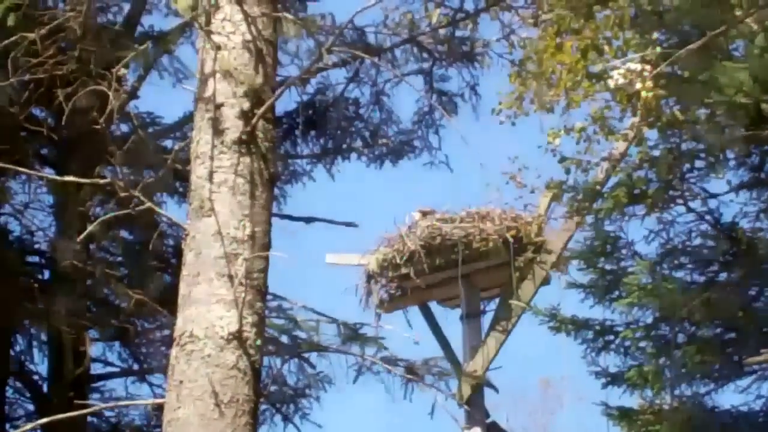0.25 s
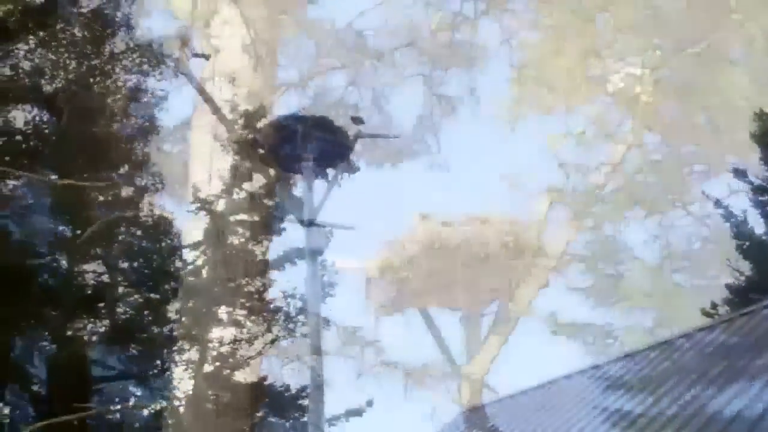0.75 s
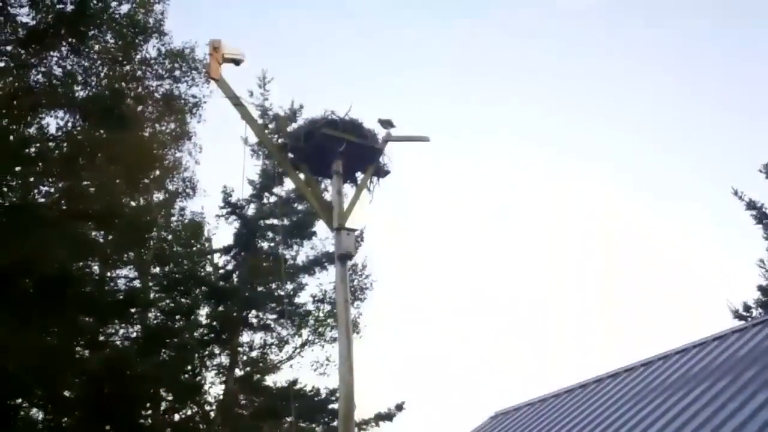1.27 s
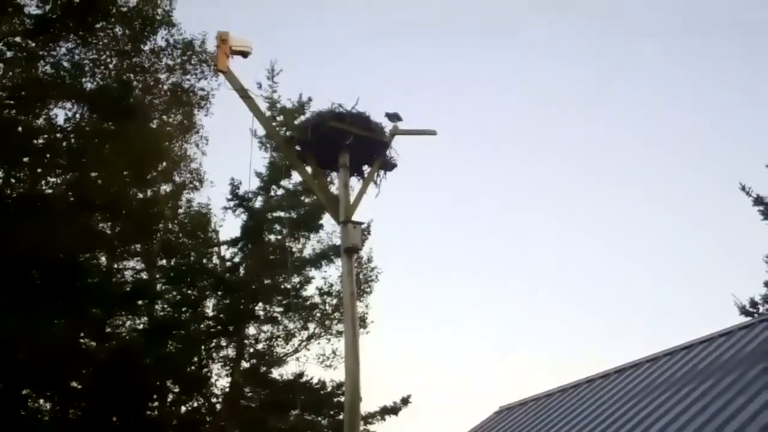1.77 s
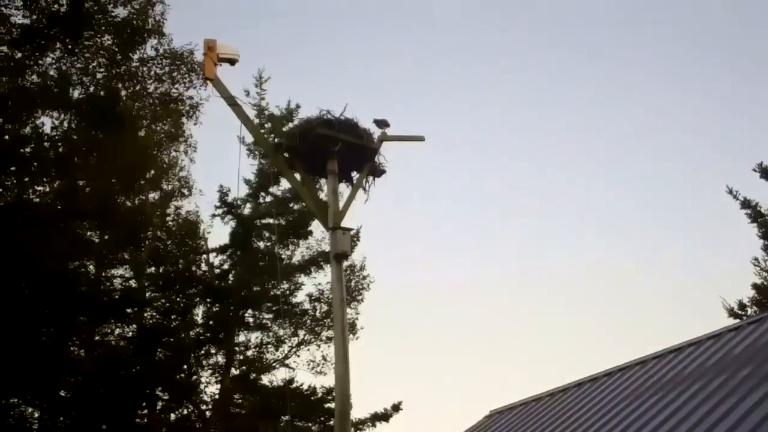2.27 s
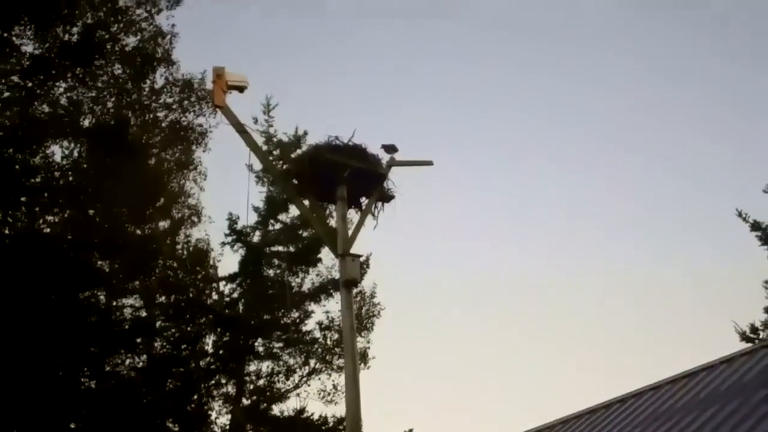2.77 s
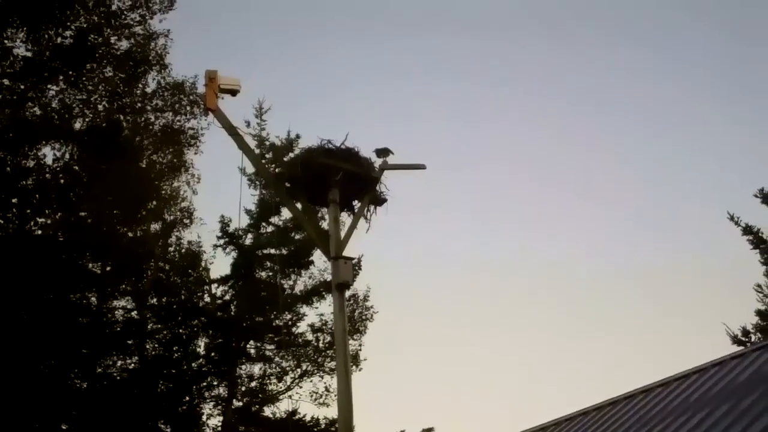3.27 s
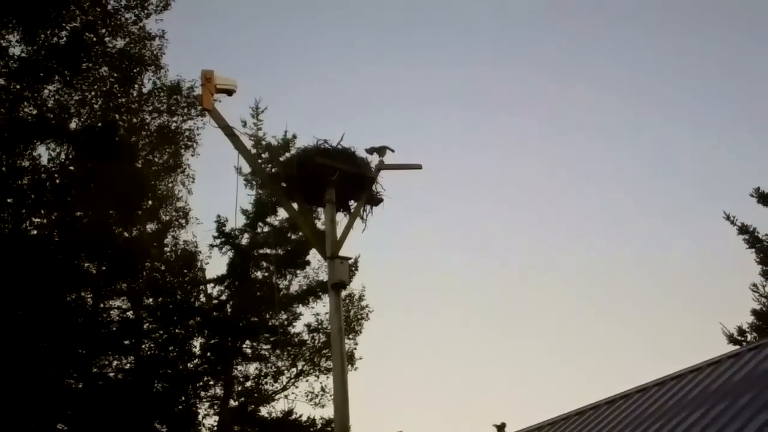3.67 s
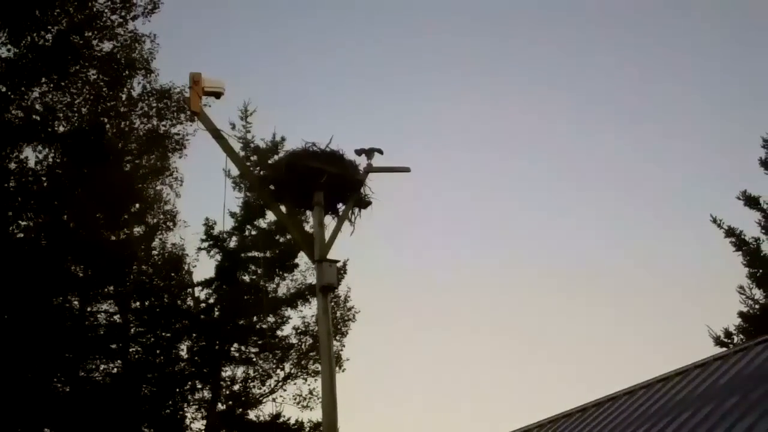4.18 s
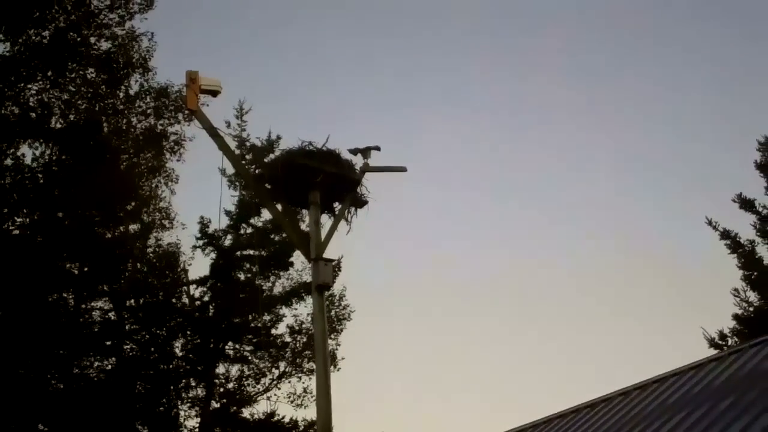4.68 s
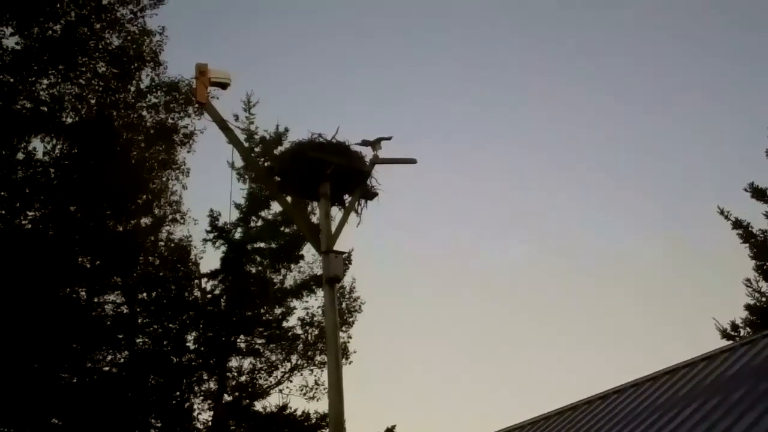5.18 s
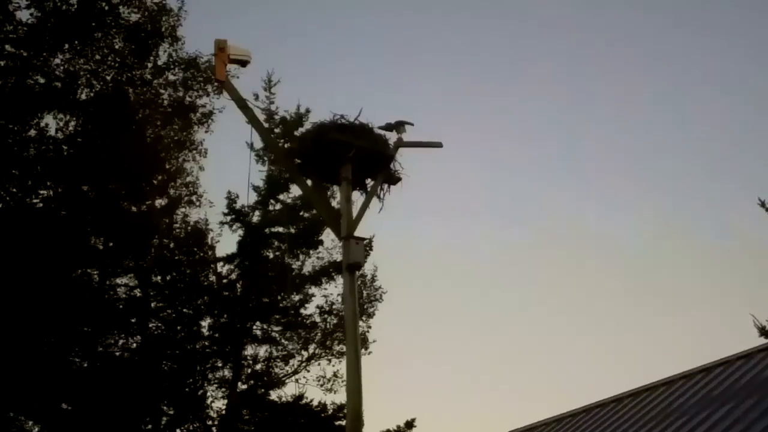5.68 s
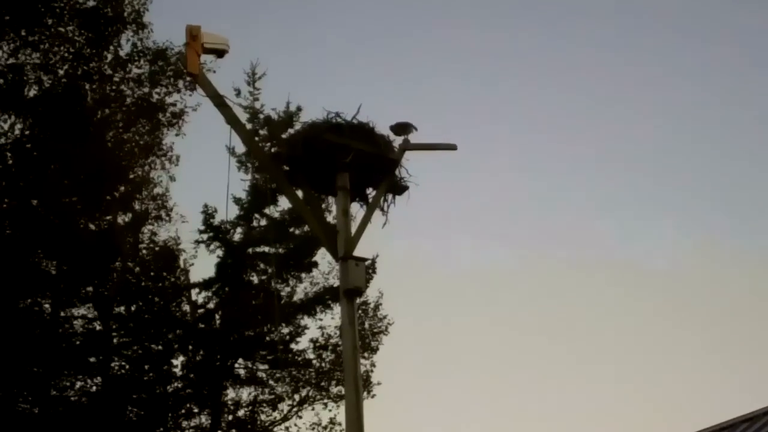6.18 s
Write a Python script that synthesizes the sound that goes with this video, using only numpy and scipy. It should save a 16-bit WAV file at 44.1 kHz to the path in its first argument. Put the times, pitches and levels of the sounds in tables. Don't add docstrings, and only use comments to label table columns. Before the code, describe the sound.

Breeze with a droning motor fades into a quiet clearing, where a distant osprey gives a fast, even run of high two-step chirping whistles.

```python
import sys
import numpy as np
from scipy import signal
from scipy.fft import rfft, irfft
from scipy.io import wavfile
from scipy.ndimage import uniform_filter1d

SR = 44100
rng = np.random.default_rng(int(sys.argv[2]) if len(sys.argv) > 2 else 0)


def inscribe(sig):
    pcm = np.round(np.clip(np.atleast_2d(sig).T, -1, 1) * 32767)
    wavfile.write(sys.argv[1], SR, pcm.astype(np.int16))


def ratio(d):
    e = np.asarray(d, float) / 20
    return 10 ** e


N = 284004
RUN_UP_S = 0.016


def evened(x):
    return x / np.sqrt(np.mean(x ** 2) + 1e-20)


def read(points, hz):
    f, value = np.transpose(points)
    return np.interp(np.log(hz + 1), np.log(f + 1), value)


def curve(points):
    s, db = np.transpose(points)
    return ratio(np.interp(np.arange(N) / SR, s, db))


def add(mix, s, sound):
    part = mix[round(s * SR):][:len(sound)]
    part += sound[:len(part)]


def band(x, lo_hz, hi_hz):
    return signal.sosfilt(signal.butter(2, [lo_hz, hi_hz], "band", fs=SR, output="sos"), x)


def resonate(x, hz, width_hz):
    turn = np.exp(2j * np.pi * hz * np.arange(x.shape[-1]) / SR)
    r = np.exp(-np.pi * width_hz / SR)
    return 2 * (turn * signal.lfilter([1 - r], [1, -r], x / turn)).real


def lean(x, points, lead=((1, 0),)):
    hz = np.fft.rfftfreq(N, 1 / SR)
    sides = np.array([[.5], [-.5]])
    return irfft(rfft(x) * ratio(sides * read(points, hz)) * np.exp(1j * sides * read(lead, hz)), N)


def low_voice(low, half_db, low_octave_db, shade):
    overtones = np.cos(2 * low) + shade * ratio(-20.0) * np.cos(3 * low) + ratio(-41) * np.cos(4 * low)
    halves = np.cos(1.5 * low) + ratio(-19) * np.cos(low / 2) + ratio(-16) * np.cos(2.5 * low)
    return np.cos(low) + ratio(low_octave_db) * overtones + ratio(half_db) * halves


def high_voice(high, shaken, octave_db, twelfth_db, tired_db):
    octave = shaken * ratio(octave_db) * np.cos(2 * high)
    upper = np.cos(3 * high) + ratio(-18 + 1.24 * tired_db) * np.cos(4 * high)
    return np.cos(high) - octave + ratio(twelfth_db) * upper


def mixed_voices(low, high, strain_db, tired_db, shade):
    under = np.cos(low) + ratio(-6.5) * np.cos(low + high) + ratio(-7.5) * np.cos(2 * high - low)
    under += ratio(-18.5) * np.cos(2 * low)
    upper = ratio(-6 + tired_db) * np.cos(low + 3 * high)
    upper += np.cos(low + 2 * high) + np.cos(2 * low + 2 * high)
    return under + shade * ratio(-23 - 0.35 * strain_db) * upper


def breath(air, shade):
    wide = band(band(air, 3200, 9700), 3000, 8200)
    return ratio(-17.5) * band(air, 2800, 5340) + ratio(-27) / shade * wide


def whistle(glide_row, arch_row, turned_db, strain_db, bill_db, crest_s):
    # crest pitch in Hz, level in dB.
    high_octave = [(2670, -14), (2790, -9.5), (2950, -9.5), (3060, -10), (3150, -13.5), (3250, -17)]
    start, first_hz, last_hz, lead_db = glide_row
    jump, length, crest_hz, main_db = arch_row
    close = jump + length
    tired_db = -2 * (start - 3.9)
    octave_db = read(high_octave, crest_hz) + 0.23 * bill_db + 4.1 * np.clip((start - 5.7) / 0.37, 0, 1)
    twelfth_db = -31.5 + bill_db - 0.65 * max(turned_db, 0)
    half_db, under_db = -24 + 1.56 * strain_db, -23 + .9 * strain_db
    shade = ratio(-.9 * max(turned_db, 0))

    t = np.arange(start - RUN_UP_S, close + .012, 1 / SR)
    early = np.clip((start - t) / 0.01505, 0, 1)
    wobble = uniform_filter1d(rng.standard_normal((3, 6000)), size=70, axis=1)
    wobble = evened(uniform_filter1d(wobble, size=30, axis=1))[:, :len(t)]

    past = np.clip(t, jump, close + 0.0036) - jump - crest_s
    arch_hz = crest_hz - np.where(past < 0, 210000, 209700) * past ** 2
    share = np.clip((t - start) / (jump - start), 0, 1)
    bend = (0.014 - 0.00091 * tired_db) * np.sin(2.47 * share)
    glide_hz = (first_hz + (last_hz - first_hz) * share) * (1 - 0.1318 * early + bend)
    low_hz = np.where(t < jump, glide_hz, .755 * arch_hz)
    low = 2 * np.pi * np.cumsum(low_hz * (1 + 0.002 * wobble[0])) / SR
    high = 2 * np.pi * np.cumsum(arch_hz * (1 + .0007 * wobble[1])) / SR

    handed = np.sin(np.pi / 2 * np.clip((t - jump) / .0036 + .4, 0, 1)) ** 2
    shut = np.clip((close + 0.0035 - t) / 0.004, 0, 1)
    faint = shade * ratio(lead_db - 21 - 1.1 * tired_db) * np.sqrt(1 - early)
    fullest = np.clip(0.5 + 0.032 * turned_db, .1, .95)
    swell = ratio(lead_db + np.interp(share, [0, fullest, 1], [-5.5, 0, -2]))
    lead = np.maximum(swell * np.exp(-early / 0.061), faint) * (1 - handed)
    jump_db = -1 - 0.042 * max(bill_db, 0) ** 2
    main = ratio(main_db + np.interp(t, [jump, jump + crest_s, close], [jump_db, 0, -1])) * handed * shut

    glide = low_voice(low, half_db + 5 * wobble[2], -9.5 + tired_db, shade)
    shaken = ratio(12.5 * ratio(under_db) * wobble[0])
    top = high_voice(high, shaken, octave_db, twelfth_db, tired_db)
    under = ratio(under_db + 2.5 * wobble[2]) * mixed_voices(low, high, strain_db, tired_db, shade)
    closing = ratio(main_db - 17.5 - 1.1 * tired_db) * np.exp(-((t - close - .004) / 0.0023) ** 2)
    closing = closing * (np.cos(low) + ratio(-4.0) * np.cos(2 * low))
    air = (lead + main) * rng.standard_normal(6000)[:len(t)]
    return np.sqrt(2) * (lead * glide + main * (top + under) + closing) + breath(air, shade)


def osprey():
    # start in seconds, first pitch in Hz, last pitch in Hz, level in dB.
    glides = [(1.348, 2307, 2370, -43), (1.529, 1806, 1970, -37.5), (1.691, 1930, 2110, -37),
              (1.859, 1953, 2176, -34.5), (2.031, 1964, 2187, -32), (2.206, 1970, 2177, -32),
              (2.383, 2070, 2250, -31), (2.557, 2077, 2270, -30.5), (2.729, 2140, 2310, -31.5),
              (2.894, 2120, 2340, -31), (3.063, 2090, 2430, -34.5), (3.232, 2170, 2503, -35.5),
              (3.404, 2146, 2522, -35), (3.573, 2220, 2610, -36), (3.745, 2280, 2513, -35),
              (3.918, 2218, 2470, -33), (4.085, 2150, 2422, -33.5), (4.26, 2140, 2375, -32.5),
              (4.432, 2142, 2367, -33), (4.606, 2155, 2416, -30.5), (4.779, 2176, 2440, -30),
              (4.958, 2205, 2383, -26.5), (5.144, 2207, 2360, -24), (5.335, 2220, 2324, -25.5),
              (5.511, 2190, 2344, -25.5), (5.699, 2187, 2320, -29.5), (5.881, 2150, 2350, -30),
              (6.085, 2180, 2260, -29), (6.274, 2162, 2290, -30)]
    # jump in seconds, length in seconds, crest pitch in Hz, level in dB.
    arches = [(1.358, 0.052, 2648, -33), (1.545, 0.041, 2774, -24.5), (1.711, 0.041, 2826, -24.5),
              (1.881, 0.039, 2825, -23.5), (2.054, 0.033, 2834, -22.5), (2.226, 0.045, 2861, -26),
              (2.402, 0.047, 2947, -27), (2.58, 0.045, 2968, -27), (2.751, 0.049, 3034, -27.5),
              (2.917, 0.053, 3067, -27.5), (3.088, 0.058, 3202, -31), (3.256, 0.061, 3230, -31),
              (3.425, 0.06, 3246, -32), (3.603, 0.055, 3303, -35), (3.771, 0.061, 3270, -34.5),
              (3.942, 0.054, 3213, -32), (4.109, 0.059, 3169, -32), (4.281, 0.055, 3085, -33),
              (4.453, 0.054, 3082, -33), (4.628, 0.053, 3129, -30.5), (4.803, 0.054, 3112, -27.5),
              (4.982, 0.051, 3074, -25.5), (5.163, 0.055, 3046, -25.5), (5.348, 0.055, 3062, -25.5),
              (5.53, 0.06, 3086, -26), (5.716, 0.06, 3097, -27), (5.901, 0.06, 3083, -27.5),
              (6.101, .058, 3044, -28.5), (6.287, 0.062, 3052, -30.5)]
    # time in seconds, head turned away as echo level in dB, strain in dB,
    # bill opening in dB, time from jump to crest in seconds.
    posture = [(1.36, -1.5, -13, 17, .039), (1.551, -6.5, -10, 11, 0.022), (1.9, -5, -9.5, -8.5, 0.019),
               (2.251, 0.5, -5, -3, 0.024), (2.42, 0, 1.5, -8, .024), (2.6, 0, 3.5, -11, 0.02),
               (2.95, 3, 1, -5.5, .027), (3.3, 4, 4.5, -5, .026), (3.65, 10, 5.5, 0, 0.026),
               (4.0, 5.5, 4.5, 1, 0.027), (4.3, 7.5, 1, 8.5, .027), (4.55, 7.5, 0.5, 7.5, .026),
               (4.8, 1.5, -1, -9.5, .025), (5.148, -2.5, -0.5, 3.5, 0.024), (5.549, -2, 1.5, 3.5, .027),
               (5.9, -2, 5, -0.5, 0.026), (6.1, -1, 5.5, 0.5, 0.027), (6.3, -3, 3.5, 4, .028)]
    # frequency in Hz, level in dB.
    bird_lean = [(2000, 5), (3000, 5.5), (6000, 4), (8500, 8), (12000, 21.5)]
    # frequency in Hz, left ahead by radians.
    bird_lead = [(2000, .1), (3500, .1), (6200, 0.91), (9000, 1), (12000, .3)]
    ground_s, ground_db = 273 / 44100, -6
    direct, sent = twigs(), np.zeros(N)
    times, *controls = np.transpose(posture)
    for glide, arch in zip(glides, arches):
        turned_db, *rest = [np.interp(arch[0], times, c) for c in controls]
        sound = whistle(glide, arch, turned_db, *rest)
        start = glide[0] - RUN_UP_S
        add(direct, start, sound)
        add(direct, start + ground_s, ratio(ground_db) * sound)
        add(sent, start, ratio(turned_db) * sound)
    echoes = signal.fftconvolve(sent[None], wood(), axes=1)[:, :N]
    return lean(direct + echoes, bird_lean, bird_lead)


def twigs():
    # start in seconds, peak in dB, resonance in Hz.
    ticks = [(1.819, -43.5, 2750), (3.053, -42.5, 2920), (5.119, -51, 2280)]
    out, t = np.zeros(N), np.arange(300) / SR
    for s, db, hz in ticks:
        snap = ratio(db + 13.5 - 60 * t / 0.02) * rng.standard_normal(300)
        add(out, s, resonate(resonate(resonate(snap, hz, 2600), hz, 2700), hz, 5000))
    return out


def wood():
    # delay in seconds, level in dB.
    trunks = [(0.0116, -32), (0.0323, -12.5), (.0387, -50), (0.042, -19)]
    # frequency in Hz, time to fall 60 dB in seconds.
    tail_t60 = [(1500, 1), (3000, 0.77), (6000, 0.89), (12000, 0.38)]
    taps = np.zeros((2, SR))
    at = np.arange(300, SR - 20, 20) + rng.integers(0, 20, (2, (SR - 301) // 20))
    np.put_along_axis(taps, at, rng.choice([-1., 1.], at.shape), 1)
    taps[1] = 0.52 * taps[0] + 0.94 * taps[1]
    hz, t, z = signal.stft(taps, SR, nperseg=256)
    tail = signal.istft(z * ratio(-60 * t / read(tail_t60, hz)[:, None]), SR, nperseg=256)[1]
    t = np.arange(tail.shape[1]) / SR
    tail *= 1 + 1.0 * np.exp(-((t - .038) / 0.015) ** 2)
    tail *= ratio(-10.5) / np.linalg.norm(tail[0])
    for s, db in trunks:
        tail[:, round(s * SR)] += ratio(db)
    return tail


def rustles():
    # middle in seconds, half length in seconds, pitch in Hz, width in Hz, level in dB.
    puffs = [(.05, 0.026, 8200, 2500, -65), (0.144, 0.015, 315, 60, -47.5), (0.226, 0.027, 302, 60, -49.5),
             (0.586, 0.017, 314, 60, -56), (.44, .006, 6000, 1500, -64), (0.522, 0.031, 7800, 3000, -66),
             (3.747, 0.11, 557, 60.6, -63), (4.104, 0.045, 70, 59.5, -59), (4.968, 0.034, 990, 148, -58),
             (5.107, 0.022, 870, 490, -54), (5.401, 0.44, 44.6, 39.7, -62.5),
             (6.364, 0.031, 190, 59.7, -55.5)]
    out, t = np.zeros((2, N)), np.arange(N) / SR
    for s, half, hz, width_hz, db in puffs:
        near = slice(max(round((s - .4) * SR), 0), round((s + .4) * SR))
        a, b = rng.standard_normal((2, SR))[:, :len(t[near])]
        puff = resonate(resonate(np.array([a, 0.8 * a + 0.64 * b]), hz, width_hz), hz, width_hz)
        out[:, near] += ratio(db) * evened(puff) * np.exp(-((t[near] - s) / half) ** 2)
    return out


def wash(spectrum, patchy_db):
    # frequency in Hz, left-right correlation.
    likeness = [(60, 0.81), (180, 0.31), (520, 0.5), (1540, 0.22), (4560, 0.053), (13500, 0.05)]
    frames, hz = N // 256 + 5, np.fft.rfftfreq(1024, 1 / SR)
    a, b, c, d, patches = rng.standard_normal((frames, 513, 5)).T
    patches = evened(uniform_filter1d(uniform_filter1d(patches, 12, 0), 14, 1))
    same = np.clip(read(likeness, hz), -1, 1)[:, None]
    left = a + 1j * b
    z = np.array([left, same * left + np.sqrt(1 - same ** 2) * (c + 1j * d)])
    z *= ratio(read(spectrum, hz)[:, None] + patchy_db * patches)
    return evened(signal.istft(z, nperseg=1024, noverlap=768)[1][:, :N])


def fuzzy_lines(lines):
    noise = rng.standard_normal((len(lines), N))
    total = 0
    for v, (hz, width_hz, db) in zip(noise, lines):
        total = total + ratio(db) * evened(resonate(resonate(v, hz, width_hz), hz, width_hz))
    return total


def mains():
    drift = evened(uniform_filter1d(rng.standard_normal((2, N)), size=6000, axis=1))
    turns = 2 * np.pi * np.cumsum(57 + 0.83 * drift[0]) / SR
    return np.sqrt(2) * ratio(-61.5 + 1.0 * drift[1]) * np.cos(turns + [[0.68], [0]])


def clearing():
    # frequency in Hz, level in dB per Hz.
    air = [(20, -9), (45, -16), (90, -12.5), (200, -17.5), (400, -15), (700, -13.5), (1400, -18),
           (2700, -17.5), (8000, -26), (14000, -37.5)]
    # time in seconds, level in dB.
    air_db = [(0, -67), (.5, -63), (1.0, -57), (1.3, -54.5), (3.5, -53.5), (6.44, -54)]
    # hum pitch in Hz, width in Hz, level in dB.
    hum = [(118.5, 7.6, -69.5), (2684, 45, -71.5), (8050, 25, -78)]
    return curve(air_db) * (wash(air, 1.14) + ratio(54.0) * (fuzzy_lines(hum) + mains()))


def earlier_place():
    # frequency in Hz, level in dB per Hz.
    breeze = [(18, -48), (30, -7), (111, -9.5), (155, -8.5), (253, -10.5), (319, -8.5), (481, -14),
              (638, -13), (2690, -19), (7710, -27), (13900, -39.5)]
    # time in seconds, level in dB.
    breeze_db = [(0, -52.5), (.2, -51), (.5, -54), (.8, -59), (1.15, -70)]
    # motor pitch in Hz, width in Hz, level in dB over the breeze.
    drone = [(107.6, 17, -12), (216, 35, -12), (318.4, 36, -8), (7800, 90, -26.5)]
    return curve(breeze_db) * (wash(breeze, 1.4) + fuzzy_lines(drone))


def scene():
    # frequency in Hz, level in dB.
    background_lean = [(60, 1.5), (300, 2.5), (2500, 2), (12000, 4)]
    return osprey() + lean(earlier_place() + clearing() + rustles(), background_lean)


def low_pass(x):
    return signal.sosfilt(signal.butter(12, 14070, fs=SR, output="sos"), x)


def record(dry):
    # frequency in Hz, level in dB.
    capsule = [(9000, -0.5), (11000, -1.5), (12500, -4), (14000, -14)]
    hz = np.fft.rfftfreq(N, 1 / SR)
    heard = irfft(rfft(dry) * ratio(read(capsule, hz)) * (hz < 14070), N)
    return low_pass(heard)


dry = scene()
out = record(dry)
inscribe(out)
```